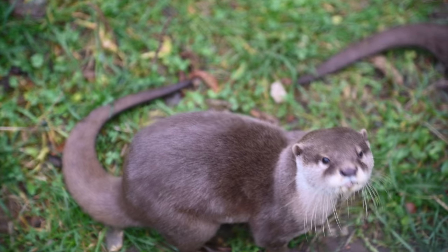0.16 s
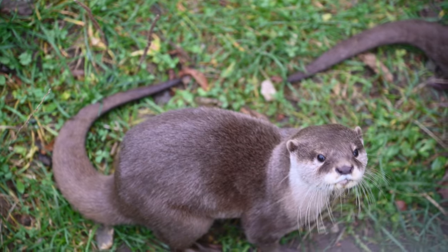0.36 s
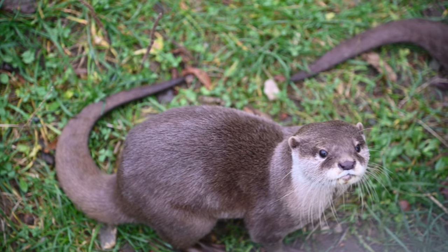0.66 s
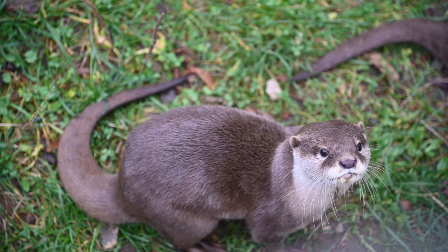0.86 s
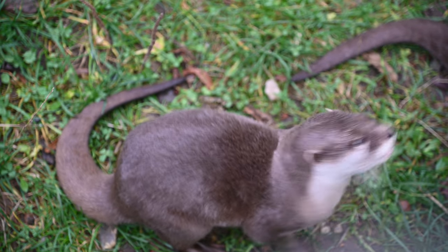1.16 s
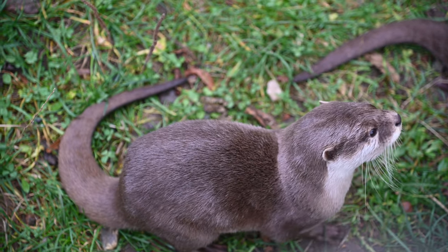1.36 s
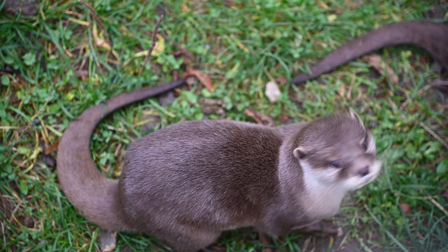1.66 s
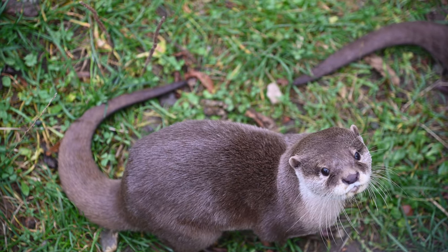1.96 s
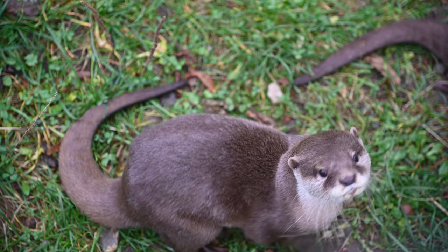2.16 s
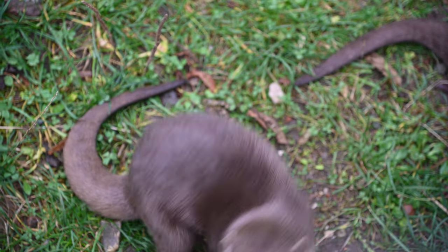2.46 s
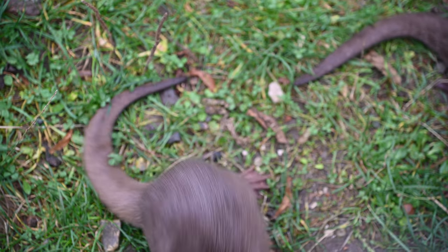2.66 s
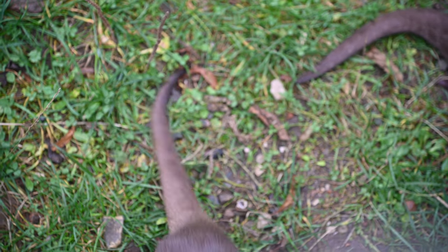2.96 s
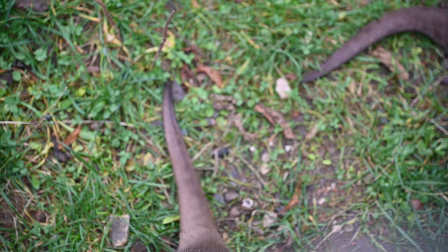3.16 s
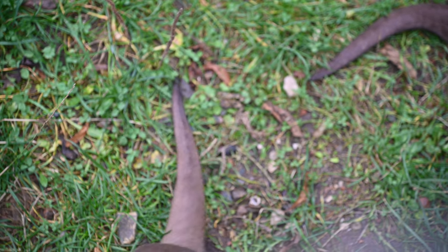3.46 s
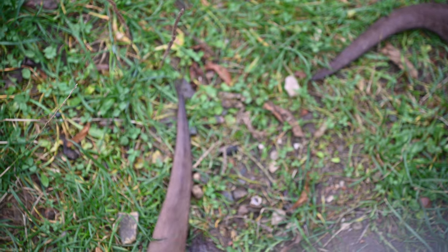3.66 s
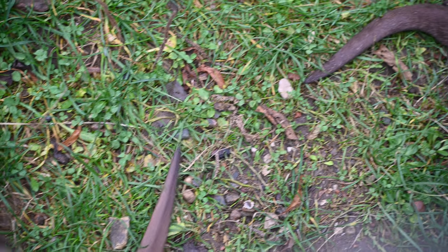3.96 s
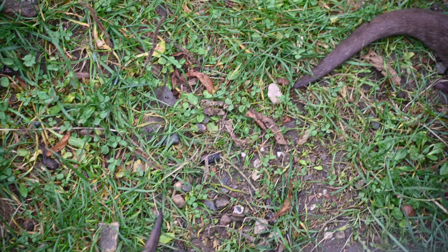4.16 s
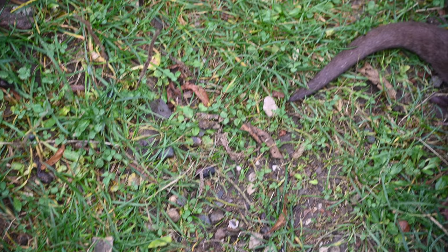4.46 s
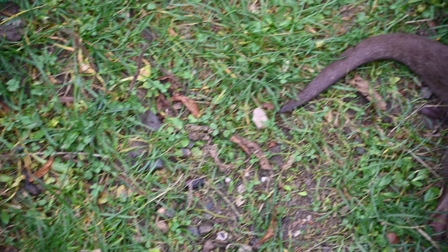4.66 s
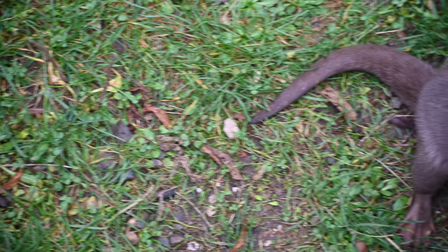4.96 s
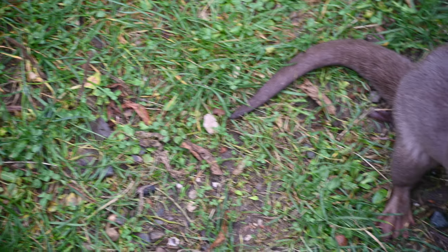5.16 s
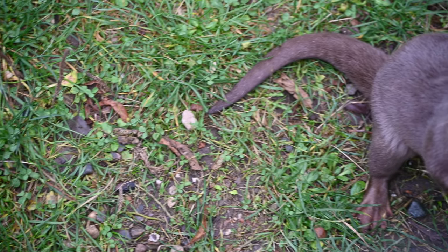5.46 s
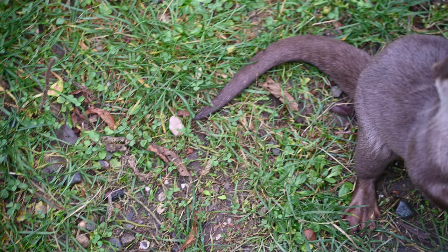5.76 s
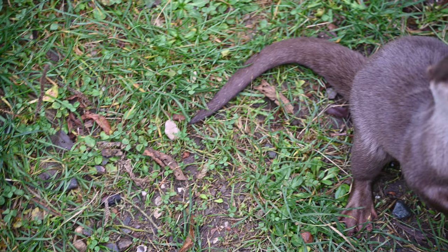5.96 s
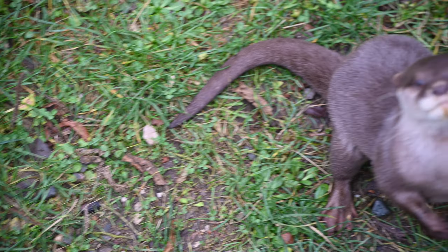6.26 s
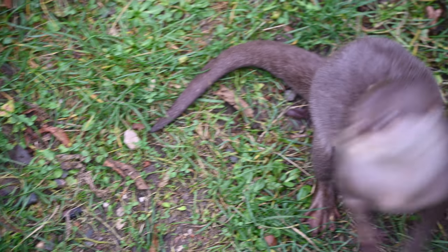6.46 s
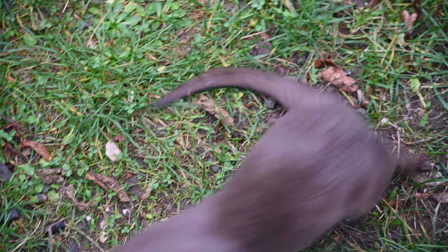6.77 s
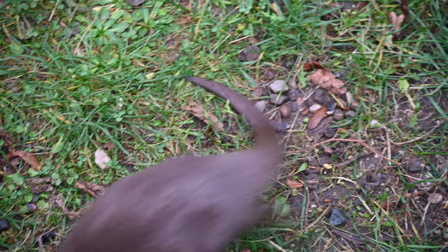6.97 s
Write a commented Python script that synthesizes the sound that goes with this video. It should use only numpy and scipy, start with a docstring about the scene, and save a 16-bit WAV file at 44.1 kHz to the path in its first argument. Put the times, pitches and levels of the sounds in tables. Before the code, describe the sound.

Small otters chirp and whistle in turn on open grass, with paw rustles and low growls, ending in a loud throbbing rasp.

```python
"""Open grass outdoors, with small otters close to a nearly mono microphone with gain control.
One gives arched chirps, another thin falling whistles that snap down into short squeaks: harmonics on gliding pitches.
Low hums and short sine pips come between or during them; growls and a loud rasp are noise throbbing in resonances.
Paws rustle the grass in swells of coloured noise, with small dry ticks and soft knocks.
Steady noise makes the distant outdoor wash, and short noise responses make the echoes."""
import sys
import numpy as np
from scipy import signal
from scipy.fft import rfft, irfft
from scipy.io import wavfile
from scipy.ndimage import uniform_filter1d

SR = 44100
rng = np.random.default_rng(int(sys.argv[2]) if len(sys.argv) > 2 else 0)


def generate_wav(sig):
    """Save sig (samples, or channels by samples) to the path in sys.argv[1] as 16-bit PCM at SR."""
    pcm = np.round(np.clip(np.atleast_2d(sig).T, -1, 1) * 32767).astype(np.int16)
    wavfile.write(sys.argv[1], SR, pcm)


N = 313874

# Arched chirps: start t/s, rise t/s, hold t/s, fall t/s, start f/Hz, top f/Hz, end f/Hz, bend of the fall,
#   share of the fall after which overtones shut off, effort level/dB at five points (start, reaching the top,
#   leaving the top, shut-off, end), mid-top swell level/dB, 1st harmonic against 2nd level/dB,
#   its change across the top level/dB, 3rd harmonic against 2nd level/dB
ARCH_CHIRPS = [(1.245, .042, 0.078, 0.091, 860, 1731, 1032, 2.9, 0.46, -17.5, -6.5, -3.5, -8.5, -39, -0.5, -11.5, -8.5, -4.5),
               (2.133, 0.088, 0.061, 0.042, 508, 1758, 904, 1.64, 0.32, -43, -22, -24.5, -31.5, -56, 11, 1.5, -2, -2.5),
               (3.229, 0.039, 0.096, 0.074, 759, 1730, 928, 1.4, 0.6, -33, -22, -29, -29, -34, 10, 0.5, -12, -6.5),
               (4.312, .05, 0.087, 0.054, 840, 1698, 907, 2.23, 0.27, -35.5, -35.5, -37.5, -32.5, -41, 6, 6, -14.5, 2.5),
               (5.019, 0.049, .095, 0.071, 654, 1692, 928, 2.6, 0.25, -45, -32.5, -35.5, -33.5, -52, 2, 5.5, -14, 3.5),
               (6.276, .035, .088, .04, 1236, 1717, 1053, 1.2, .9, -28, -26, -18.5, -20, -30, 3.5, -3.5, -31, -4),
               (6.942, 0.042, 0.11, 0.045, 996, 1720, 1027, 0.9, .9, -46, -26.5, -17.5, -8, -20, 7.5, -21, 1, -2.5)]
# Throat colour of the chirps: f/Hz, level/dB
CHIRP_THROAT = [(500, 6), (900, 1), (1350, -7), (1750, 0.5), (2200, -4.5), (2700, -10), (3400, 0.5),
                (4200, -5), (5200, -4.5), (7000, -12), (9000, -21.5)]
# Falling whistles, some overlapping; one glide per list: t/s, f/Hz, level/dB
WHISTLE_GLIDES = [
    [(1.133, 5530, -31), (1.152, 4850, -24.5), (1.16, 4640, 0), (1.18, 4350, -9.5), (1.21, 4307, -5.5),
     (1.228, 3790, -13)],
    [(2.285, 5290, -38), (2.325, 5296, -16.5), (2.343, 4860, -12), (2.354, 5020, -14.5),
     (2.366, 4403, -5.5), (2.39, 4000, -5), (2.408, 3690, -12.5)],
    [(3.45, 4710, -39), (3.467, 4410, -39), (3.476, 4210, -22), (3.483, 4150, -43)],
    [(4.093, 4250, -34), (4.104, 4020, -21.5), (4.112, 3900, -33), (4.133, 3910, -48)],
    [(5.285, 5105, -26), (5.32, 4600, -31), (5.338, 4520, -34), (5.345, 4470, -12), (5.365, 4113, -6.5),
     (5.388, 3960, -73)],
    [(6.033, 5540, -54), (6.064, 5730, -34), (6.082, 5160, -38.5), (6.112, 4520, -44)],
    [(6.661, 4560, -21), (6.669, 4070, -8), (6.676, 3900, -33)],
    [(2.305, 7600, -52.5), (2.34, 6580, -29), (2.36, 6300, -21.5), (2.375, 6240, -42.5)],
    [(3.428, 6700, -50), (3.442, 5910, -31), (3.472, 5840, -60)],
    [(4.055, 7400, -50), (4.07, 6880, -38), (4.085, 6420, -31), (4.11, 5360, -38)],
    [(5.268, 7470, -32.5), (5.3, 7450, -21), (5.347, 6070, -19.5), (5.355, 5900, -40)],
    [(6.638, 8080, -60), (6.658, 5820, -27), (6.668, 5130, -36)],
]
# Squeaks that close a whistle: start t/s, length t/s, start f/Hz, end f/Hz, 1st, 2nd and 3rd harmonic level/dB,
#   fade level/dB, lines halfway between harmonics level/dB, overshoot of the start as a share of the pitch
CLOSING_SQUEAKS = [(1.231, 0.033, 1810, 1670, -27.5, -15, -28, -2.5, -18, 0.19),
                   (2.411, 0.056, 1957, 1640, -25.5, -18, -27, -12, -16, .12),
                   (3.4836, 0.041, 1787, 1200, -20.5, -22.5, -30, -18.5, -10.5, 0.22),
                   (4.137, .029, 1713, 1620, -29, -30, -39, -20, -2.5, 0.18),
                   (5.392, 0.022, 1870, 1520, -19.5, -32, -30, -21.5, -5.5, 0.21),
                   (6.128, .06, 1677, 1940, -33.5, -37, -40, -10, -15, .01),
                   (6.671, .04, 2217, 2590, -12.5, -12, -31.5, -4, -10, 0.0084)]
# Low hums: start t/s, length t/s, start f/Hz, end f/Hz, start level/dB, end level/dB
LOW_HUMS = [(4.845, .21, 683, 623, -43.5, -37.5), (6.444, 0.11, 549, 497, -40, -43.5)]
# Throat colour of the hums: f/Hz, level/dB
HUM_COLOUR = [(500, 6.5), (700, -3.5), (1350, 0), (2000, -4), (2700, 1), (3300, -12), (4000, -1.5),
              (4700, -34), (6000, -14)]
# Short sine pips: start t/s, peak level/dB, f/Hz, length t/s
SINE_PIPS = [(1.507, -23.5, 1050, 0.0024), (2.365, -25.5, 2820, 0.025), (2.604, -40, 500, 0.054),
             (5.276, -16.5, 5780, 0.012), (6.6, -18, 1135, 0.013)]
# Growl swells: start t/s, length t/s, start level/dB, end level/dB
GROWL_SWELLS = [(2.66, .61, -46, -33), (4.72, 0.37, -47, -41)]
# Noise spectrum of the growls: f/Hz, relative level/dB
GROWL_SPECTRUM = [(500, -22), (840, -3.5), (1550, -5), (2430, -8.5), (3000, -4.5), (4400, -1),
                  (5700, -27.5), (7300, -27.5), (8100, -16.5), (9300, -39.5)]
# Resonances of the growls: f/Hz
GROWL_RESONANCES = [850, 1340, 1700]
# Rasp swells: start t/s, length t/s, start level/dB, end level/dB
RASP_SWELLS = [(6.11, 0.164, -29, -34), (6.275, .85, -23, -20.5)]
# Noise spectrum of the rasp: f/Hz, relative level/dB
RASP_SPECTRUM = [(300, -41), (760, -19.5), (900, -8), (1700, -5), (3500, -2.5), (5100, -6), (5700, -29.5),
                 (6600, -15.5), (7400, -27), (8200, -20.5), (9200, -38), (10000, -28.5), (10700, -43),
                 (11400, -33), (14000, -69)]
# Resonances of the rasp: f/Hz
RASP_RESONANCES = [894, 1369, 1810, 1991, 2208, 2680, 3150, 3500, 3490, 3774, 4360, 4480]
# Paws and fur in the grass: start t/s, length t/s, rustle swell level/dB, fine hiss swell level/dB
GRASS_MOVES = [(0, 0.36, -54, -65), (1.432, 0.8, -45, -58), (2.54, 0.32, -48.5, -60),
               (2.77, 0.21, -52, -61), (3.294, 0.44, -51, -54), (3.955, 0.27, -48.5, -51),
               (4.15, 0.65, -49.5, -62), (4.56, 0.74, -43, -75), (5.988, 0.19, -51.5, -62),
               (6.3, 1.3, -54, -74)]
# Noise spectrum of the rustle: f/Hz, relative level/dB
GRASS_SPECTRUM = [(150, -23.5), (400, 13.5), (1500, 16.5), (4000, 15), (8000, 4.5), (15500, -9)]
# Small dry ticks: t/s, level/dB
DRY_TICKS = [(0.163, -36), (0.243, -40), (0.3009, -38), (0.344, -39), (0.355, -40), (0.389, -41),
             (0.4218, -37), (0.4781, -38), (0.658, -36.5), (0.6995, -37.5), (0.717, -40), (3.752, -40),
             (3.886, -38), (4.2716, -29.5), (4.3138, -31.5), (4.3218, -31)]
# Soft knocks on the hand-held body: t/s, peak level/dB, f/Hz
BODY_KNOCKS = [(0.186, -44, 280), (0.297, -38.5, 350), (0.424, -48, 240), (0.651, -43.5, 384),
               (4.261, -43, 367), (4.311, -44, 247)]
# Noise spectrum of the outdoor wash: f/Hz, relative level/dB
WASH_SPECTRUM = [(25, -26.5), (60, -11), (180, -15), (600, -13), (950, -2), (1140, -4), (1970, -2),
                 (2550, -14), (3900, -16), (5300, -37), (15600, -29)]
# Wash above the rumble: t/s, level/dB
WASH_CURVE = [(0, -50.5), (.65, -47), (1.4, -51.5), (1.85, -51.5), (7.117, -44)]
# Rumble below the wash: t/s, level/dB
RUMBLE_CURVE = [(0, -62), (7.117, -67)]

MOUTH_HZ, MOUTH_DB_PER_KHZ = 7200, -3   # above this the mouth radiates ever less
ARCH_CROWN, RISE_BEND = 0.045, 1.2   # the top bows by this share; above 1 a rise starts slowly
OVERTONES_SHUT_DB, SHUT_S = -30, 0.02   # overtones grow through the rise and shut off quickly in the fall
UPPER_STEP_DB, STEP_PER_EFFORT = -7.5, 0.16   # 4th and 5th harmonics step down, the 5th further when soft
TAIL_SAG_HZ_PER_S = 3500   # extra sinking of the pitch after the shut-off
OCTAVE_DB, OCTAVE_GROWTH = -20, 1.05   # a whistle's octave grows faster than the whistle
OCTAVE_DB_PER_KHZ = -12   # and weakens for whistles above 5.3 kHz
SQUEAK_BEND, OVERTONE_LOSS_DB = 4.0, -32   # the pitch gives way late, and overtones die with it
SQUEAK_STEP_DB = -8.5   # from one upper harmonic to the next
HUM_SETTLE_S, HUM_SETTLE_SHARE, HUM_SETTLE_DB = 0.037, 0.061, -2   # a hum starts sharp and dull
SWELL_IN_S, SWELL_OUT_S, SWELL_EDGE_DB = 0.11, 0.0098, -11
RUSTLE_PEAK_SHARE, RUSTLE_FLOOR_DB = 0.39, -63.5   # where in a movement it peaks; constant stir
ECHO_S, ECHO_DB = 0.017, -15   # one distinct echo from a nearby wall
CUTOFF_HZ = 15790


def arches():
    """The pitch climbs, bows over a held top and slides off; the throat colours each harmonic as it passes."""
    notes = []
    for row in ARCH_CHIRPS:
        start, rise, hold, fall, start_hz, top_hz, end_hz, bend, shut = row[:9]
        *effort_db, swell_db, first_db, loss_db, third_db = row[9:]
        t = np.arange(0, rise + hold + fall, 0.002)
        up = np.clip(t / rise, 0, 1)
        across = np.clip((t - rise) / hold, 0, 1)
        down = np.clip((t - rise - hold) / fall, 0, 1)

        bow = 4 * across * (1 - across)
        shoulder_hz = top_hz * (1 - ARCH_CROWN)
        climb_hz = (shoulder_hz - start_hz) * up ** RISE_BEND
        slide_hz = (shoulder_hz - end_hz) * (1 - (1 - down) ** bend)
        sag_hz = TAIL_SAG_HZ_PER_S * fall * np.maximum(down - shut, 0)
        pitch = start_hz + climb_hz + top_hz * ARCH_CROWN * bow - slide_hz - sag_hz

        corners = np.cumsum([0, rise, hold, shut * fall, (1 - shut) * fall])
        level_db = np.interp(t, corners, effort_db) + swell_db * bow
        closing = np.clip((down - shut) * fall / SHUT_S, 0, 1)
        dull_db = OVERTONES_SHUT_DB * ((1 - up) ** 2 + closing)
        first = first_db + loss_db * across * np.maximum(1 - down / shut, 0)
        third = third_db + dull_db
        fourth = third_db + 2 * dull_db + UPPER_STEP_DB
        fifth = fourth + UPPER_STEP_DB + STEP_PER_EFFORT * level_db
        levels = [level_db + share_db + through(CHIRP_THROAT, k * pitch)
                  for k, share_db in enumerate([first, dull_db, third, fourth, fifth], start=1)]
        notes.append(np.transpose([start + t, pitch, *levels]))
    return notes


def whistles():
    """Each falling whistle carries its octave, which thins out for the highest pitches."""
    notes = []
    for rows in WHISTLE_GLIDES:
        glide = []
        for s, hz, db in rows:
            high_loss_db = OCTAVE_DB_PER_KHZ * max(hz - 5300, 0) / 1000
            glide.append((s, hz, db, OCTAVE_DB + OCTAVE_GROWTH * db + high_loss_db))
        notes.append(glide)
    return notes


def whistle_hiss(below_db):
    """Coloured hiss that rises and falls with the level of the whistles."""
    level = np.zeros(N)
    for rows in WHISTLE_GLIDES:
        first, (_, level_db) = span(rows)
        level[first:first + len(level_db)] += amp(level_db + below_db)
    hiss = coloured(rng.standard_normal(N), [(2000, -23.5), (3200, -4.5), (6800, -14.5), (15500, -20.0)])
    return uniform_filter1d(level, size=600) * hiss


def squeaks():
    """Strong and weak beats alternate, so the wave repeats at half the pitch; it fades from the snap on."""
    notes, u = [], np.linspace(0, 1, num=12)
    for start, length, hz, end_hz, first_db, second_db, third_db, fade_db, half_db, _ in CLOSING_SQUEAKS:
        late = u ** SQUEAK_BEND
        upper_db = fade_db * u / 2 + OVERTONE_LOSS_DB * late
        first = first_db + fade_db * u
        second, third = second_db + upper_db, third_db + upper_db
        upper = [third + SQUEAK_STEP_DB * k for k in range(1, 4)]
        whole = [first - 40, first, second, third] + upper   # led by a stand-in below the 1st
        levels = []
        for low, high in zip(whole, whole[1:]):
            levels += [(low + high) / 2 + half_db, high]
        half_pitch = (hz + (end_hz - hz) * late) / 2
        notes.append(np.transpose([start + length * u, half_pitch, *levels]))
    return notes


def snaps(below_db):
    """The folds slap shut as a whistle drops into a squeak: a noise burst dying within milliseconds."""
    out, t = np.zeros(N), np.arange(300) / SR
    for rows in CLOSING_SQUEAKS:
        at = round(rows[0] * SR)
        burst = coloured(rng.standard_normal(300), [(1000, -20), (2200, 0), (14000, -30)])
        loudest_db = max(rows[5:7])   # of the 2nd and 3rd harmonic
        out[at:at + 300] += amp(loudest_db + below_db) * burst * np.exp(-t / 0.0015)
    return out


def growl(notes, spectrum, tube, tube_db, width_hz, per_s, depth, uneven, rough_db):
    """Air forced through the windpipe, chopped by slack folds flapping unevenly."""
    out = np.zeros(N)
    for rows in notes:
        first, (level_db,) = span(rows)
        n = len(level_db)
        flap = np.cos(2 * np.pi * np.cumsum(per_s * (1 + uneven * wander(n, 17.8))) / SR)
        air = rng.standard_normal(n) * np.exp(depth * flap) * amp(rough_db * wander(n, 65))
        edges = np.minimum(1, np.arange(n) / (0.0075 * SR))
        out[first:first + n] += amp(level_db) * edges * coloured(air, spectrum, tube, tube_db, width_hz)
    return out


def swells(table):
    """Level curves of growls: a ramped entry, an even change in dB, a quick stop."""
    return [[(start, from_db + SWELL_EDGE_DB), (start + SWELL_IN_S, from_db),
             (start + length - SWELL_OUT_S, to_db), (start + length, to_db + SWELL_EDGE_DB)]
            for start, length, from_db, to_db in table]


def hums():
    """A sharp, dull start settles; the pitch holds, then sags."""
    notes = []
    for start, length, hz, end_hz, start_db, end_db in LOW_HUMS:
        t = np.arange(0, length, 0.004)
        unsettled = np.maximum(1 - t / HUM_SETTLE_S, 0)
        pitch = hz * (1 + HUM_SETTLE_SHARE * unsettled) + (end_hz - hz) * (t / length) ** 4
        level_db = start_db + (end_db - start_db) * t / length
        levels = [level_db + through(HUM_COLOUR, k * pitch) + HUM_SETTLE_DB * unsettled * (k > 1)
                  for k in range(1, 10)]
        notes.append(np.transpose([start + t, pitch, *levels]))
    return notes


def pips():
    """Single smooth bursts of sine tone."""
    out = np.zeros(N)
    for s, peak_db, hz, length in SINE_PIPS:
        at, n = round(s * SR), round(length * SR)
        out[at:at + n] += amp(peak_db) * np.hanning(n) * np.sin(2 * np.pi * hz * np.arange(n) / SR)
    return out


def voice(notes, fall_db, jitter, flutter, flutter_hz, breath_db, attack_s, round_s, count, kick=0):
    """Fluttering, breathy harmonics on an unsteady pitch; those past the last column fall by a fixed step."""
    out = np.zeros(N)
    for rows, overshoot in zip(notes, np.broadcast_to(kick, len(notes))):
        first, (pitch, *levels) = span(rows)
        n, t = len(pitch), np.arange(len(pitch)) / SR
        # Muscles round the corners of a glide, and fast glides are hoarser
        pitch = uniform_filter1d(pitch, round(round_s * SR), mode="nearest")
        strain = 1 + np.minimum(0.1 * np.abs(np.gradient(np.log(pitch))) * SR, 5)
        pitch = pitch * (1 + overshoot * np.exp(-t / 0.0035))   # a sudden start overshoots the pitch
        phase = 2 * np.pi * np.cumsum(pitch * (1 + jitter * strain * wander(n, 130))) / SR
        edges = np.minimum(1, np.minimum(t / attack_s, t[::-1] / 0.0014))
        for k in range(1, count + 1):
            level_db = levels[min(k, len(levels)) - 1] + fall_db * max(k - len(levels), 0)
            if k > len(levels):
                level_db = level_db + MOUTH_DB_PER_KHZ * np.maximum(k * pitch - MOUTH_HZ, 0) / 1000
            waver = 1 + flutter * np.tanh(wander(n, flutter_hz))
            airy = 1 + amp(breath_db) * strain * wander(n, 800)   # turbulence spreads a skirt round each line
            audible = k * pitch < SR / 2.2   # keeps clear of aliasing
            tone = np.sqrt(2) * amp(level_db) * waver * airy * np.sin(k * phase) * audible
            out[first:first + n] += edges * tone
    return out


def grass(grainy_db):
    """Grainy rustle: each movement swells and dies over a faint constant stir, with a finer hiss on top."""
    t, level, fine = np.arange(N) / SR, amp(RUSTLE_FLOOR_DB), 0
    for start, length, peak_db, fine_db in GRASS_MOVES:
        peak = start + RUSTLE_PEAK_SHARE * length
        share = np.interp(t, [start, peak, start + length], [0, 1, 0])
        shape = np.sin(share * np.pi / 2) ** 2
        level, fine = level + amp(peak_db) * shape, fine + amp(fine_db) * shape
    air = rng.standard_normal(N) * amp(grainy_db * wander(N, 40))
    hiss = coloured(rng.standard_normal(N), [(6000, -26), (9500, -2), (14000, 0)])
    return level * coloured(air, GRASS_SPECTRUM) + fine * hiss


def ticks(decay_s):
    """Small dry ticks: coloured noise bursts of a few milliseconds."""
    out, t = np.zeros(N), np.arange(256) / SR
    for s, level_db in DRY_TICKS:
        at = round(s * SR)
        tick = coloured(rng.standard_normal(256), [(500, 6.5), (4000, 6.0), (10000, -12.5), (12500, -10)])
        out[at:at + 256] += amp(level_db) * tick * np.exp(-t / decay_s)
    return out


def bumps(rise_s):
    """Low damped knocks on the hand-held body: a sine under a quick rise and decay."""
    out, t = np.zeros(N), np.arange(2200) / SR
    shape = t / rise_s * np.exp(1 - t / rise_s)
    for s, peak_db, hz in BODY_KNOCKS:
        at = round(s * SR)
        out[at:at + 2200] += amp(peak_db) * shape * np.sin(2 * np.pi * hz * t)
    return out


def yard(x, t60):
    """Scattered echoes from ground, fences and walls: a decaying noise response."""
    t = np.arange(round(0.5 * SR)) / SR
    spectrum = [(300, 6), (1500, -12.5), (4500, 8.5), (9000, 11), (16000, -15.5)]
    response = coloured(rng.standard_normal(len(t)), spectrum)
    response = response * amp(-60 * t / t60) * np.minimum(1, t / 0.011)
    return signal.fftconvolve(x, response / np.sqrt(np.sum(response ** 2)))[:N]


def wash(patchy_db):
    """Far traffic, leaves and microphone hiss as coloured noise; the rumble below moves on its own."""
    air = coloured(rng.standard_normal(N), WASH_SPECTRUM)
    low = signal.sosfiltfilt(signal.butter(2, 300, fs=SR, output="sos"), air)
    t = np.arange(N) / SR
    high_db = np.interp(t, *np.transpose(WASH_CURVE))
    low_db = np.interp(t, *np.transpose(RUMBLE_CURVE))
    return amp(high_db + patchy_db * wander(N, 20)) * unit(air - low) + amp(low_db) * unit(low)


def amp(db):
    """Decibels to gain."""
    return 10 ** (np.asarray(db) / 20)


def unit(x):
    """Scaled to rms 1."""
    return x / np.sqrt(np.mean(x ** 2) + 1e-20)


def span(rows):
    """First sample and columns of a table, sampled over its own length."""
    s, *columns = np.transpose(rows)
    first, last = max(round(s[0] * SR), 0), min(round(s[-1] * SR), N)
    return first, [np.interp(np.arange(first, last) / SR, s, c) for c in columns]


def wander(size, hz):
    """Random drift of rms 1, up to about hz changes a second."""
    r = np.exp(-2 * np.pi * hz / SR)
    noise = rng.standard_normal(size + 3000)
    return unit(signal.lfilter([1], [1, -2 * r, r * r], noise)[3000:])   # drops the filter's run-in


def coloured(x, spectrum, tube=(), tube_db=0, width_hz=50):
    """x through a smooth spectrum, with the resonances of a tube standing out; rms 1."""
    hz = np.fft.rfftfreq(len(x), 1 / SR) + 1
    gain = amp(through(spectrum, hz))
    lift = 1 + sum(amp(tube_db) / (1 + (2 * (hz - c) / width_hz) ** 2) for c in tube)
    return unit(irfft(rfft(x) * gain * lift, len(x)))


def through(spectrum, hz):
    """Level in dB of a spectrum at a frequency, joined up along log frequency."""
    f, level_db = np.transpose(spectrum)
    return np.interp(np.log(hz), np.log(f), level_db)


def scene():
    """All sources sit in the middle; the two channels differ a little, mostly in the treble."""
    calls = voice(arches(), fall_db=-17.0, jitter=0.0045, flutter=0.33, flutter_hz=60, breath_db=-27,
                  attack_s=0.004, round_s=0.018, count=9)
    calls += voice(whistles(), fall_db=-15.0, jitter=0.003, flutter=0.51, flutter_hz=99, breath_db=-29,
                   attack_s=0.0034, round_s=0.0045, count=3)
    calls += voice(squeaks(), fall_db=-6.0, jitter=0.017, flutter=0.74, flutter_hz=197, breath_db=-29.5,
                   attack_s=0.0004, round_s=0.0099, count=12, kick=np.transpose(CLOSING_SQUEAKS)[-1])
    calls += voice(hums(), fall_db=-5.0, jitter=0.004, flutter=0.6, flutter_hz=30, breath_db=-24,
                   attack_s=0.007, round_s=0.02, count=12)
    calls += snaps(below_db=-3.5) + pips() + whistle_hiss(below_db=-24.5)
    calls += growl(swells(GROWL_SWELLS), GROWL_SPECTRUM, GROWL_RESONANCES, tube_db=6.0, width_hz=35,
                   per_s=43, depth=0.6, uneven=0.05, rough_db=1.5)
    calls += growl(swells(RASP_SWELLS), RASP_SPECTRUM, RASP_RESONANCES, tube_db=7.5, width_hz=35,
                   per_s=53, depth=0.34, uneven=0.16, rough_db=1.5)
    # Small throats give no bass
    calls = signal.sosfilt(signal.butter(2, 380, "high", fs=SR, output="sos"), calls)
    calls = calls + amp(ECHO_DB) * np.pad(calls, (round(ECHO_S * SR), 0))[:N]
    calls = calls + amp(-19.5) * yard(calls, t60=0.06)   # the ground and bodies close by blur each glide
    far = amp(-23) * yard(calls, t60=0.33)   # farther walls ring on

    mid = calls + far + grass(grainy_db=1.5) + ticks(decay_s=0.0022) + bumps(rise_s=0.0024)
    mid = mid + wash(patchy_db=0.1)

    treble = signal.butter(2, 3000, "high", fs=SR, output="sos")
    hiss_spectrum = [(30, -22), (200, 0), (500, -14), (2500, -8), (6000, 0), (15000, 0)]
    hiss = amp(-70) * coloured(rng.standard_normal(N), hiss_spectrum)
    side = amp(-27.0) * signal.sosfilt(treble, yard(mid, t60=0.03)) + hiss
    return np.array([mid + side, mid - side])


def record(dry):
    """Gain control pulls loud calls down fast and lets go gradually; peaks are rounded, the top is cut."""
    level_db = 10 * np.log10(uniform_filter1d(dry.mean(axis=0) ** 2, size=220) + 1e-12)
    ramp = 100 * np.arange(N) / SR   # the held level falls by 100 dB per second
    held_db = np.maximum.accumulate(level_db + ramp) - ramp
    cut_db = uniform_filter1d(-0.45 * np.maximum(held_db + 18, 0), size=200)   # acts above -18 dB
    rounded = 0.9 * np.tanh(dry * amp(cut_db) / 0.9)
    return signal.sosfilt(signal.ellip(10, 0.3, 60, CUTOFF_HZ, fs=SR, output="sos"), rounded)


dry = scene()
out = record(dry)
generate_wav(out)
```